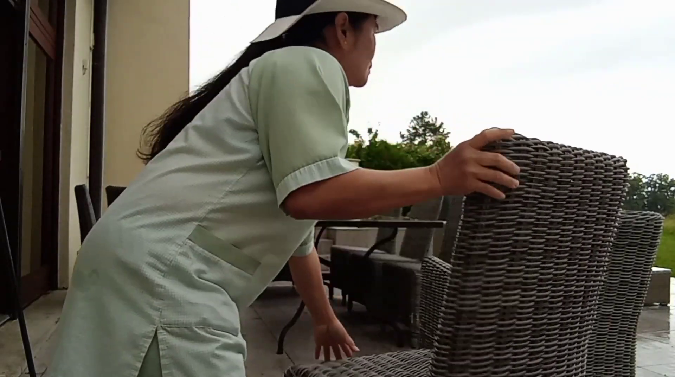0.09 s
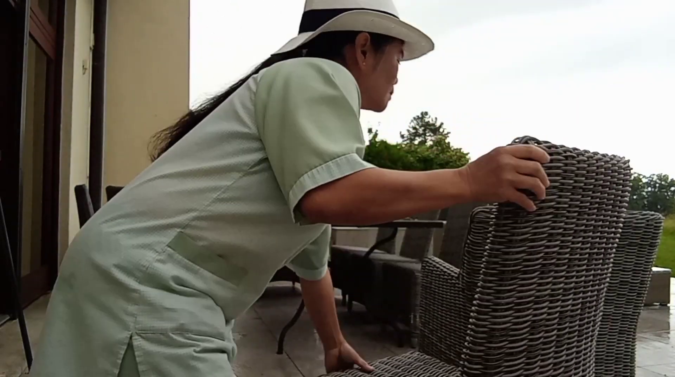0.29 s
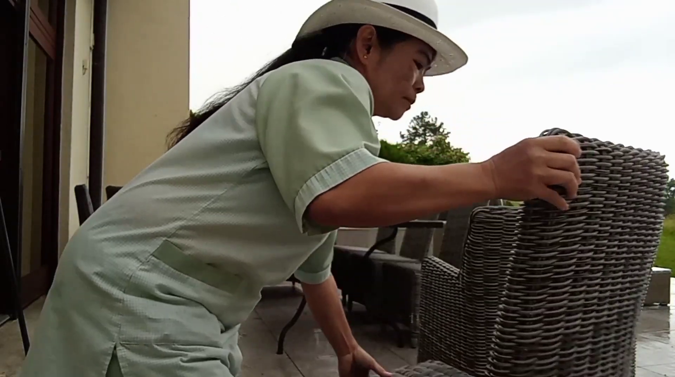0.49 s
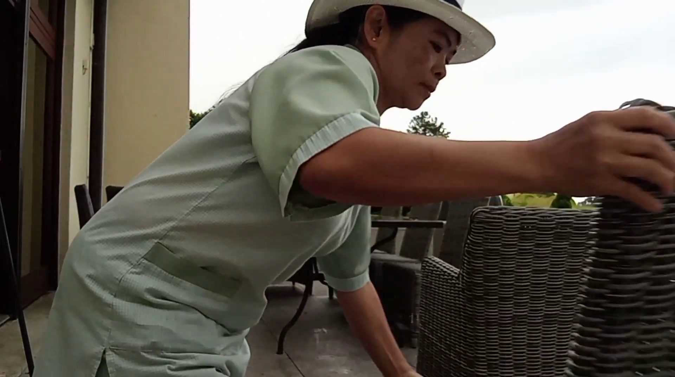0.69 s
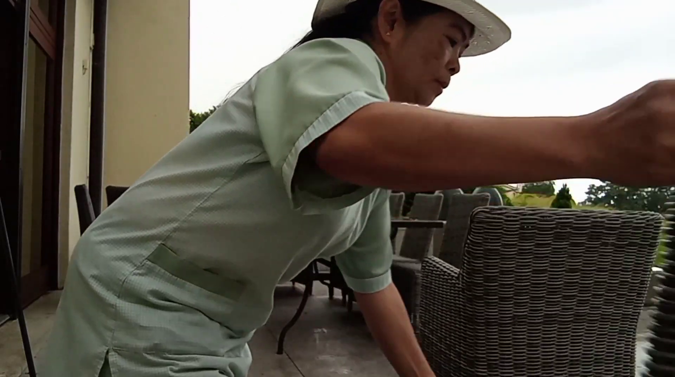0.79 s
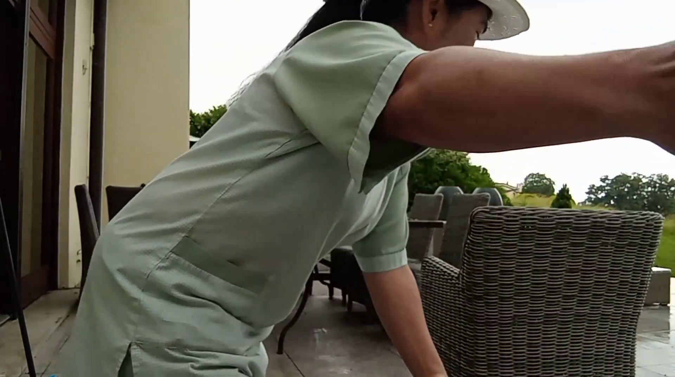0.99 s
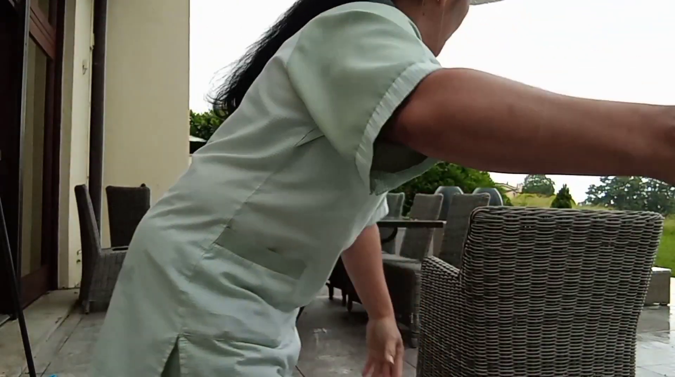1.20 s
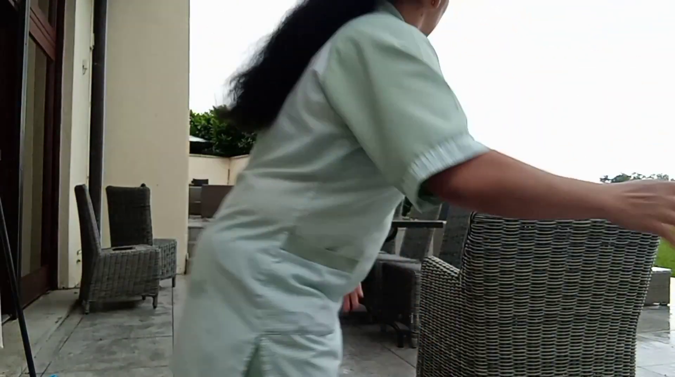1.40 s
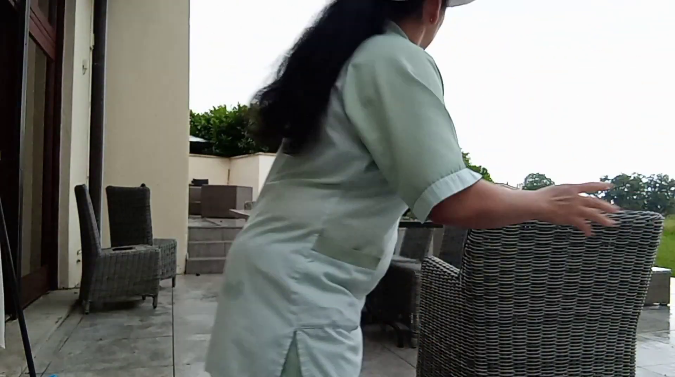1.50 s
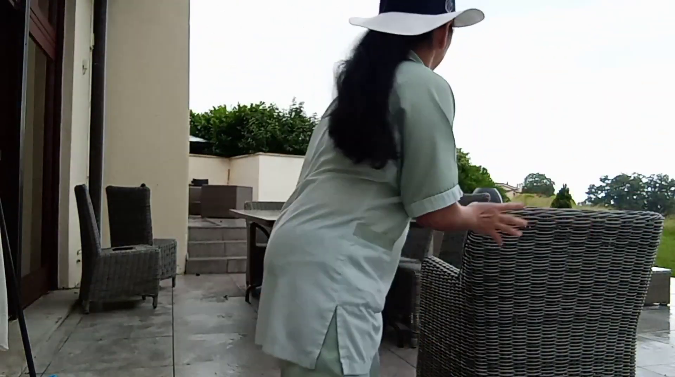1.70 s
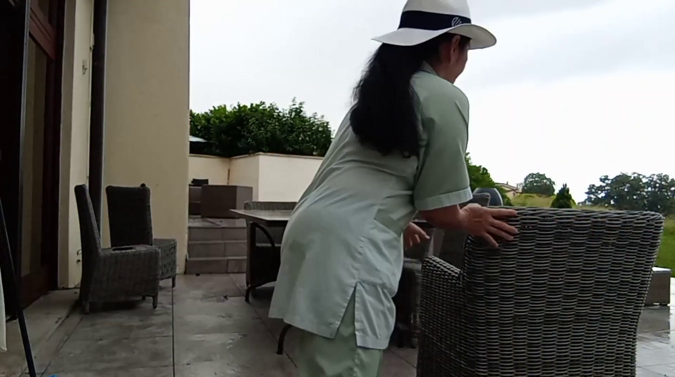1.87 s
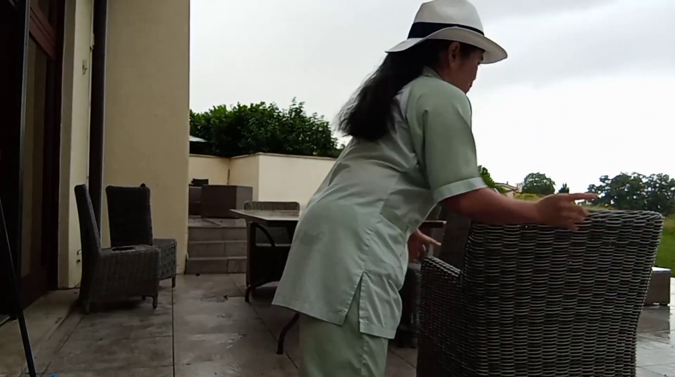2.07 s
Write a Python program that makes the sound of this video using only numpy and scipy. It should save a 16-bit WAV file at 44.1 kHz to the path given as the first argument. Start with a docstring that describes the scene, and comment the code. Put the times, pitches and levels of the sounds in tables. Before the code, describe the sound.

Close to a phone on a paved terrace, a woven chair clacks down, creaks, and scrapes roughly over slab edges, bumping quickly, then stops; faint far motor hum and soft sole hiss remain, with a short wall echo.

```python
"""Wicker armchair dragged over paving

Stick-slip clicks and jolts on slab edges excite the modes of a hollow chair frame, close to a phone.
Filtered random grains make the rasp of grit, and shaped noise a later scuff of shoe soles. A decaying
noise tail echoes them from a wall; shaped noise and wavering sines make open air and a far motor."""
import sys
import numpy as np
from scipy import signal
from scipy.fft import rfft, irfft, next_fast_len
from scipy.io import wavfile
from scipy.ndimage import uniform_filter1d

SR = 44100
rng = np.random.default_rng(int(sys.argv[2]) if len(sys.argv) > 2 else 0)


def pcm_store(signal):
    """Save signal as 16-bit PCM."""
    levels = np.round(np.clip(np.atleast_2d(signal), -1, 1) * 32767)
    wavfile.write(sys.argv[1], SR, levels.astype(np.int16).T)


def volts_from_db(level):
    """Convert decibel levels to linear amplitude ratios."""
    exponent = np.asarray(level, float) / 20
    return 10 ** exponent


N = 92610

# modes of chair frame and weave: (nominal frequency [Hz], relative level [dB], T60 [s])
FRAME_MODES = [(135.1, -15.5, 0.29), (215, -9, 0.26), (259.3, 0, 0.11), (290, 1.5, 0.1), (325.5, -1, 0.079),
               (397.9, -8, 0.14), (466.6, -4.5, 0.089), (492, -9.5, 0.097), (643, -6, 0.03),
               (745, -16.5, .06), (825, -12, 0.092), (879, -15, 0.067), (960, -11.5, 0.084),
               (1140, -7, 0.019), (1453, -3.5, 0.011), (1580, -14.5, 0.047), (1993, -32, 0.035),
               (2178, -21.5, 0.057)]
MODE_HZ = np.array(FRAME_MODES)[:, 0]
# spectrum of grit under a sliding foot or sole: (frequency [Hz], relative density [dB per Hz])
GRIT_SPECTRUM = [(900, -7), (1500, 3.5), (2160, -6.5), (3800, -6.5), (5300, -7.5), (7000, -23.5),
                 (9200, -14), (11200, -27.5), (13400, -32.5), (15000, -14), (16000, -33)]


def level(x, db):
    """Root-mean-square scaling: bring a signal to an rms level in dB."""
    return x * volts_from_db(db) / np.sqrt(np.mean(x ** 2))


def colour(x, table):
    """Linear filtering: weight the spectrum by (Hz, dB) points, then bring the rms to 1."""
    f, db = np.array(table).T
    size = next_fast_len(N)
    hz = np.maximum(np.arange(size // 2 + 1) * SR / size, 1)
    gain = volts_from_db(np.interp(np.log(hz), np.log(f), db))
    return level(irfft(rfft(x, size) * gain, size)[:N], 0)


def walk(rate):
    """Smoothed random modulation: levels held for 1 / rate s, slewed twice, with unit spread."""
    k = int(SR / rate)
    held = np.repeat(rng.standard_normal(N // k + 1), k)
    w = uniform_filter1d(uniform_filter1d(held, k), k)[:N]
    return w / w.std()


def clicks(rate, scatter_db):
    """Random impulse train: clicks of both signs and scattered size, at unit rms."""
    occurs = rng.random(N) < rate / SR
    size_db = scatter_db * np.minimum(rng.exponential(size=N), 3.5)
    sign = np.sign(rng.standard_normal(N))
    return level(occurs * sign * volts_from_db(size_db), 0)


def high(x, hz):
    """Zero-phase high-pass filtering: keep what lies above hz without delay."""
    return signal.sosfiltfilt(signal.butter(4, hz, "high", fs=SR, output="sos"), x)


def control(column):
    """Time-varying excitation: one column of the drag, interpolated over time."""
    # course of the drag: (time [s], relative frame drive [dB], relative grit rasp [dB],
    # extra brightness of the rasp [dB])
    drag = np.array([(0, -33, -50.5, 7), (.05, -40.5, -57, -3.5), (0.139, -30, -57.5, -4),
                     (.205, -41, -54.5, -3.5), (0.253, -23, -48.5, 2), (.31, -44, -66, 5.5),
                     (.4, -40.5, -80.5, 25), (0.462, -41, -55.5, -2.5), (0.529, -44, -62.5, -4),
                     (0.558, -33.5, -56, 8), (0.578, -43, -53.5, 1), (.63, -29, -44.5, -0.5),
                     (.7, -27, -40.5, -2), (.8, -18, -41.5, -0.5), (0.881, -19, -44, -2.5),
                     (1.0, -18.5, -42.5, 4), (1.099, -21.5, -47, -5.5), (1.151, -32, -47, 2),
                     (1.2, -27, -40.5, 3.5), (1.228, -30.5, -48, -4), (1.275, -34.5, -49, 6.5),
                     (1.329, -40.5, -48.5, 5.5), (1.368, -47.5, -73, 1), (1.55, -55.5, -99, 4.5)])
    return np.interp(np.arange(N) / SR, drag[:, 0], drag[:, column])


def ring(phases, gains_db, ratio):
    """Modal superposition: damped sines answer a tap, their phases and shares set by where it falls."""
    bloom_s = 0.00033
    t = np.arange(SR // 3) / SR
    out = np.zeros(len(t))
    for (hz, db, t60), phase, gain_db in zip(FRAME_MODES, phases, gains_db):
        decay = np.exp(-np.log(1000) * t / t60)
        out += volts_from_db(db + gain_db) * decay * np.sin(2 * np.pi * hz * ratio * t + phase)
    return (1 - np.exp(-t / bloom_s)) * out


def stick_slip():
    """Stick-slip friction: each foot slips on its own and keeps the frame rumbling and creaking."""
    feet, weave_hz = 4, 600
    slips_per_s, catches_per_s, slip_scatter_db = 700, 270, 0.36  # rates for all feet together
    drive_db, judder_hz, judder_db = -6, 36.15, 2.5
    # creak of the weave against the frame rumble: (time [s], relative level [dB])
    creak = [(0, 3), (.23, 4), (.56, 5), (.6, 12.5), (.66, 3), (.9, -1)]
    creak_db = np.interp(np.arange(N) / SR, *np.array(creak).T)
    upper = MODE_HZ > weave_hz
    out = np.zeros(N)
    for _ in range(feet):
        p, g = rng.standard_normal((2, len(FRAME_MODES)))
        size = np.sqrt(feet * np.sum(ring(2 * np.pi * p, g, 1.) ** 2))
        for part, rate, part_db in ((~upper, slips_per_s, 0), (upper, catches_per_s, creak_db)):
            # -200 dB silences the modes outside this part
            body = ring(2 * np.pi * p, np.where(part, 1.78 * g, -200), 1 + 0.013 * p[0])
            force_db = control(column=1) + part_db + drive_db + judder_db * walk(judder_hz)
            drive = clicks(rate / feet, slip_scatter_db) * volts_from_db(force_db)
            out += signal.fftconvolve(drive, body)[:N] / size
    return out


def jolts():
    """Impact excitation: feet catching on the paving knock the modes, which ring shorter than freely."""
    stiff_hz, stiff_db = 440, 7.5  # jolts favour the stiffer modes
    focus_db, focus_oct = 18.5, 0.16
    rise_share, push_s = 0.2, 0.00049  # rise as a share of the ring length; width of the push
    # catches on the paving: (time [s], peak before the radiation filter [dB], ring length [s],
    # favoured pitch before modal detuning [Hz])
    catches = [(0.216, -8, 0.0067, 290), (.2165, -13.5, 0.0092, 470), (.219, -18, 0.0087, 745),
               (0.2404, -16, 0.0071, 429), (.247, -24, 0.012, 830), (0.258, -16, 0.024, 277),
               (0.328, -30, 0.015, 326), (0.487, -23.5, 0.028, 269.4), (0.539, -26.5, 0.035, 262),
               (0.594, -23.5, 0.031, 745), (0.608, -14.5, 0.021, 323.7), (0.693, -23, 0.014, 280),
               (0.731, -21, .02, 500), (0.794, -22, 0.039, 271), (0.824, -16.5, 0.025, 244),
               (.843, -16.5, 0.021, 237), (.86, -31, .07, 825), (0.869, -13, 0.023, 255),
               (.897, -21, 0.0079, 490), (0.924, -17.5, 0.0073, 268), (0.938, -25, 0.0079, 252),
               (0.967, -11, 0.015, 239.7), (.997, -15, 0.0059, 257), (1.018, -15.5, 0.008, 214),
               (1.055, -14, 0.014, 296), (1.087, -15.5, 0.024, 290), (1.131, -16.5, 0.013, 215),
               (1.173, -18.5, 0.0081, 216), (1.19, -16.5, 0.023, 276.5), (1.349, -34.5, 0.0056, 276)]
    out = np.zeros(N)
    spread = rng.standard_normal((len(catches), 2, len(FRAME_MODES)))
    for (s, db, length, hz), (p, g) in zip(catches, spread):
        focus = np.exp(-(np.log2(MODE_HZ / hz) / focus_oct) ** 2)
        gains_db = 1.1 * g + stiff_db * (MODE_HZ > stiff_hz) + focus_db * focus
        knock = ring(0.31 * p, gains_db, 0.97)
        u = np.arange(len(knock)) / SR / length
        envelope = (1 - np.exp(-u / rise_share)) ** 2 * np.exp(-u ** 2)
        knock = np.convolve(knock * envelope, np.hanning(int(push_s * SR) + 3))
        i = int(s * SR)
        out[i:i + len(knock)] += volts_from_db(db) * knock[:N - i] / np.abs(knock).max()
    return out


def frame():
    """Radiation efficiency: the frame's slips and jolts reach the air with their lowest part cut."""
    radiates_hz = 106.5
    high_pass = signal.butter(3, radiates_hz, "high", fs=SR, output="sos")
    return signal.sosfilt(high_pass, stick_slip() + jolts())


def grains():
    """Granular noise: dense random clicks coloured by grit and by many small strand resonances."""
    grains_per_s, scatter_db = 6000, 2
    strand_hz, strand_db = 120, 3.5  # spacing and depth of the resonances
    hz = np.arange(strand_hz, SR / 2, strand_hz)
    strands = np.c_[hz, strand_db * rng.standard_normal(len(hz))]
    return [colour(colour(clicks(grains_per_s, scatter_db), GRIT_SPECTRUM), strands) for _ in range(2)]


def grit():
    """Granular friction: crushed grains flicker apart in three bands, with thin sudden scrapes on top."""
    rasp_db, judder_db, judder_hz = -2.5, 2.5, 70.23
    # scrapes of grit or wicker: (time [s], relative level [dB], length [s], extra low rasp [dB])
    scrapes = [(0.214, -20, 0.003, -6), (0.325, -49.5, 0.027, 9.5), (0.37, -39.5, 0.034, 1),
               (0.476, -55, 0.024, -1), (0.538, -42, 0.023, 2.5), (0.579, -35.5, 0.019, -5),
               (0.603, -34, 0.018, 1), (0.658, -36, 0.021, 3), (0.745, -38, 0.013, 7),
               (0.807, -32, 0.023, 3.5), (0.827, -19, 0.0078, -5.5), (0.894, -34, 0.022, 0),
               (1.019, -36, 0.0082, -4), (1.051, -30.5, 0.011, -17), (1.164, -43, .012, -15),
               (1.24, -19, 0.011, -15), (1.256, -19, 0.011, -8)]
    t, env, body = np.arange(N) / SR, np.zeros(N), np.zeros(N)
    for s, db, length, low_db in scrapes:
        u = np.maximum(t - s, 0)
        one = volts_from_db(db - 7.0) * (1 - np.exp(-u / 0.0022)) * np.exp(-(u / length) ** 2)
        env, body = np.hypot(env, one), np.hypot(body, one * volts_from_db(low_db))
    steady, sharp = grains()
    fine, finest = high(steady, 3940.0), high(steady, 6500)
    rasp = (steady - fine) * volts_from_db(2.57 * walk(46.35))
    rasp += (fine - finest) * volts_from_db(0.35 * walk(31.3))
    rasp += finest * volts_from_db(control(column=3) + 5.15 * walk(24.63))
    top = high(sharp, 5000.0)
    middle = high(sharp, 2270.0) - top
    low = sharp - high(sharp, 2060.0)
    thin = env * top + body * (middle + volts_from_db(-0.5) * low)
    pressure_db = control(column=2) + rasp_db + judder_db * walk(judder_hz)
    return volts_from_db(pressure_db) * rasp + volts_from_db(1.7 * walk(150)) * thin


def tick():
    """Short contact impact: the hard foot cap clicks on stone at the big knock."""
    start_s, tick_db, fall_s = .2162, -18, 0.0014
    spectrum = [(400, -15), (1000, 8), (1900, 6), (3000, -12), (6500, -18), (9070, 0), (13000, -22)]
    u = np.maximum(np.arange(N) / SR - start_s, 0) / fall_s
    return volts_from_db(tick_db) * u * np.exp(-u) * colour(rng.standard_normal(N), spectrum)


def soles():
    """Sliding-friction noise: soft hiss of shoes on stone, duller as the slide slows."""
    # slides: (time [s], relative level [dB], rise [s], fall [s], first centre frequency [Hz])
    slides = [(1.901, -58.5, 0.022, 0.048, 4600), (2.049, -70.5, 0.035, 0.028, 8900)]
    t, out = np.arange(N) / SR, np.zeros(N)
    for s, db, rise, fall, hz in slides:
        # later layers are lower in pitch and weaker: (delay [s], share)
        for late, share in ((0, 0.97), (.02, 0.74), (.05, 0.54)):
            env = np.exp(-((t - s - late) / np.where(t < s + late, rise, fall)) ** 2)
            centre = hz * share
            band = [(centre * 0.64, -16), (centre, 0), (centre * 1.7, -9), (11000, -14), (15000, -6)]
            hiss = colour(colour(rng.standard_normal(N), GRIT_SPECTRUM), band)
            out += volts_from_db(db) * share * env * hiss
    return out


def house_wall(near):
    """Exponential reverberation: a dull decaying noise tail is the echo of the house wall."""
    t60_s, wall_db, top_hz, gap_s = 0.25, -17.5, 2680, .008
    t = np.arange(SR // 2) / SR
    low_pass = signal.butter(1, top_hz, fs=SR, output="sos")
    tail = signal.sosfilt(low_pass, rng.standard_normal(len(t)))
    tail = tail * np.exp(-np.log(1000) * t / t60_s) * (t > gap_s)
    return volts_from_db(wall_db) * signal.fftconvolve(near, tail / np.sqrt(np.sum(tail ** 2)))[:N]


def motor():
    """Harmonic series: the partials of a far motor waver in level, each on its own."""
    # partials: (frequency [Hz], rms level before wavering [dB])
    partials = [(91.5, -64), (183.0, -63), (274.5, -65)]
    t, out = np.arange(N) / SR, np.zeros(N)
    for hz, db in partials:
        tone = np.sin(2 * np.pi * (hz * t + rng.random()))
        out += np.sqrt(2) * volts_from_db(db + 4 * walk(12)) * tone
    return out


def open_air():
    """Broadband ambient noise: a soft wash whose level drifts a little."""
    # spectrum of the wash: (frequency [Hz], relative density [dB per Hz])
    wash = [(45, -20), (65, 0), (110, 1), (150, -15.5), (200, -7), (300, -10.5), (500, -18.5), (750, -9),
            (1000, -15), (1700, -17), (2500, -29), (3200, -39.5), (5000, -50), (7000, -53), (15000, -57)]
    return volts_from_db(-54 + 1.1 * walk(3.8)) * colour(rng.standard_normal(N), wash)


def scene():
    """Linear superposition: chair and shoes, their wall echo and the background add up."""
    near = frame() + grit() + tick() + soles()
    return (near + house_wall(near) + motor() + open_air())[None]


def band_limit(x):
    """A steep low-pass at the top of the band."""
    return signal.sosfilt(signal.butter(12, 16960, fs=SR, output="sos"), x)


def record(dry):
    """Signal chain: the finished mix passes through the phone."""
    return band_limit(dry)


dry = scene()
out = record(dry)
pcm_store(out)
```